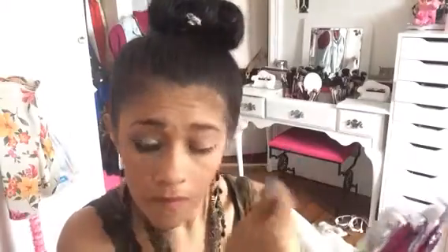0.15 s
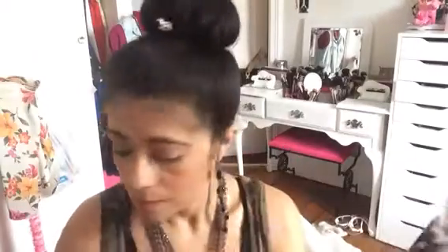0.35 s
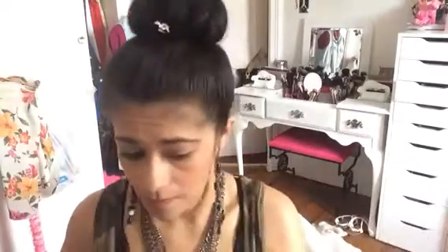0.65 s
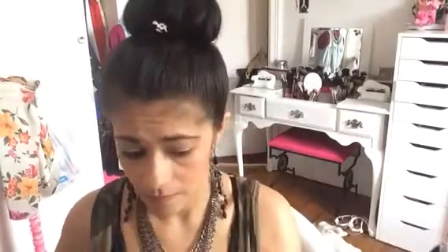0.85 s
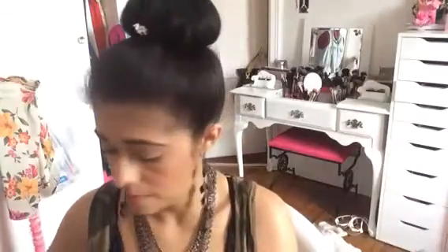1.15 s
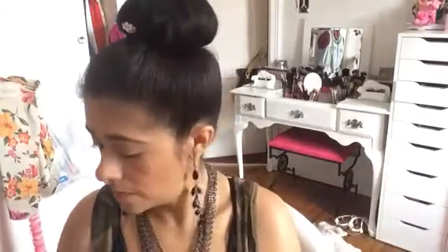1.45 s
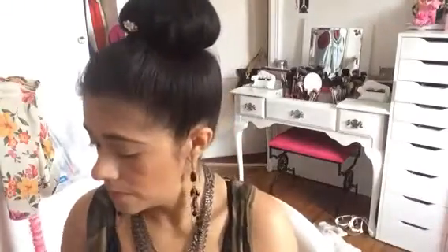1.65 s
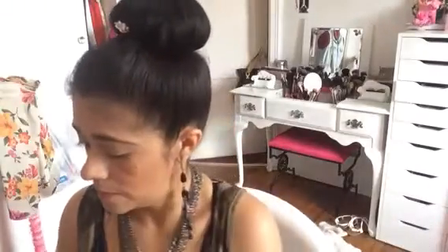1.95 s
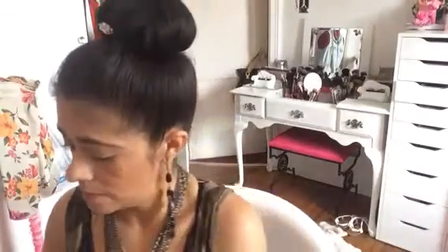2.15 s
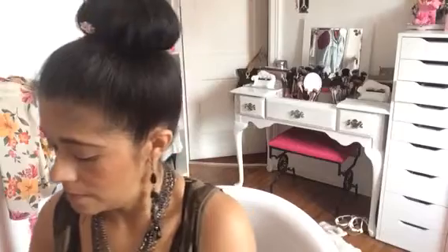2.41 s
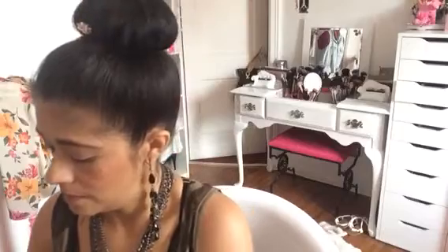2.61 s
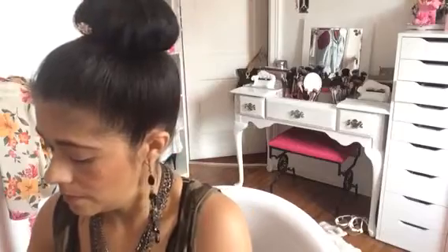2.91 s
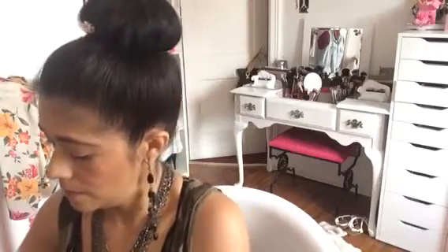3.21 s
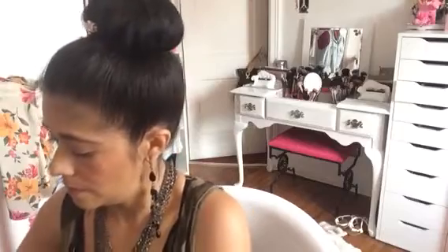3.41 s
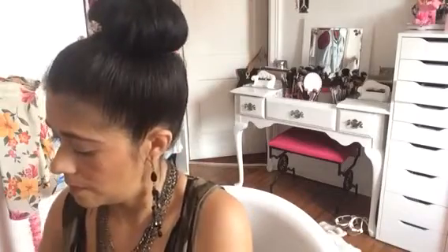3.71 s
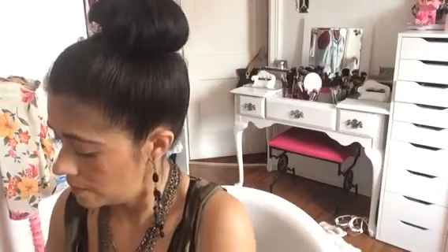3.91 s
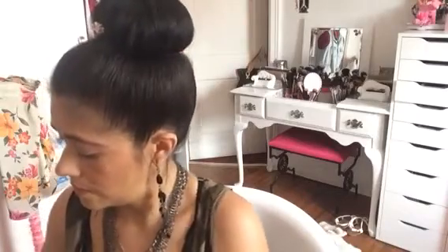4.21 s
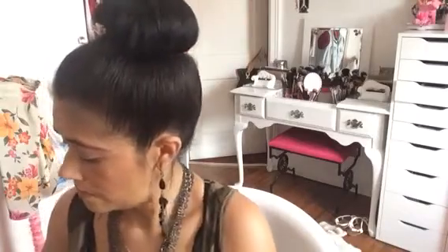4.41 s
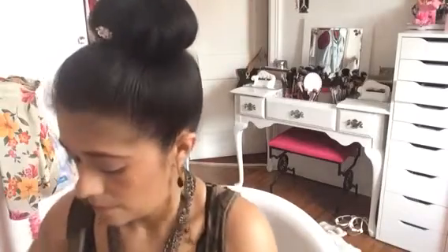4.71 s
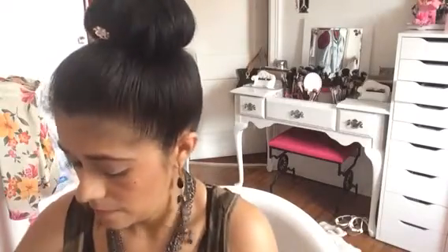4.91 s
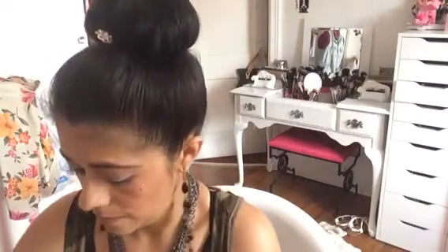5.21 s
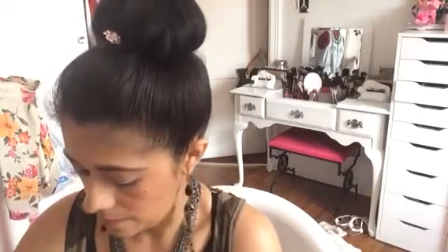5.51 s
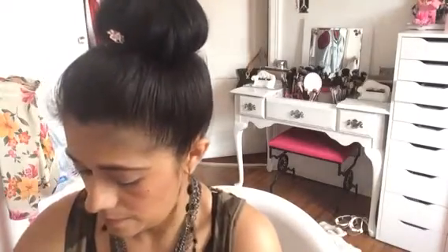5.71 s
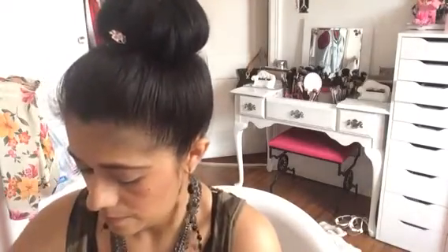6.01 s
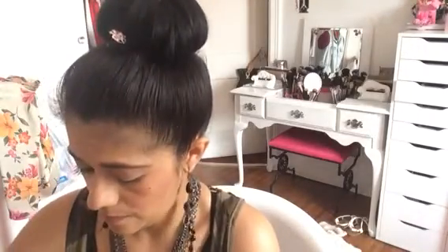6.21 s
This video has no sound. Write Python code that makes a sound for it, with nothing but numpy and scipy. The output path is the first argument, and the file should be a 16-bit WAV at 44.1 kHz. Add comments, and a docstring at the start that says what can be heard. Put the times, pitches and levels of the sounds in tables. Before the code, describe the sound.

Steady low room noise and faint mains hum run throughout a small indoor space with short reverberation. From 0.2 to 0.7 s there is a barely audible rub and nail ticks on plastic; from about 0.9 s a very faint distant clock ticks once a second. Light plastic clicks come at 1.5, 1.7 and 1.9 s. At 2.1 s the loudest event: a plastic case knocks hard on the wooden vanity, a low woody thump with a quick clattering of several hits until 2.2 s. A short scrape follows at 2.4 s, taps at 2.7 s, a firm double knock at 2.93 s, then a cluster of crisp rattling taps from 3.45 to 3.7 s. Near quiet follows with sparse, tiny ticks. From 5.2 to 5.75 s softer taps and dull thumps return, the last strongest with a small rattle. Two faint clicks end it at 6.3 s.

```python
"""Plastic make-up cases and tools on a wooden vanity in a small room, over steady mains hum and room noise.
0.2 s: a faint rub and nail ticks in the hands; 0.86 s: a far clock starts ticking once a second.
1.5 s: light clicks; 2.1 s: the hardest knock thumps the table and chatters; to 3.7 s: slides, taps, rattles.
3.8 s: sparse nail ticks; 5.2 s: more taps and soft thumps; 6.3 s: two last clicks.
Contacts are shell modes plus noise cracks, thumps are table modes, slides are dense random catches."""
import sys
import numpy as np
from scipy import signal
from scipy.fft import rfft, irfft
from scipy.io import wavfile

SR = 44100
rng = np.random.default_rng(int(sys.argv[2]) if len(sys.argv) > 2 else 0)


def output_pcm(signal):
    """Save a mono or channel-first signal as 16-bit PCM at the path in sys.argv[1].

    Samples are clipped to [-1, 1] before scaling.
    """
    pcm = np.clip(np.atleast_2d(signal).T, -1, 1) * 32767
    wavfile.write(sys.argv[1], SR, np.round(pcm).astype(np.int16))


N = 280035


def from_db(db):
    """Decibels to gain."""
    return 10 ** (np.asarray(db) / 20)


def rms_one(x):
    """Scale to rms 1."""
    return x / np.sqrt(np.mean(x ** 2) + 1e-20)


def burst_level(x, seconds):
    """Scale a burst to the energy of rms 1 held for the given time."""
    return x * np.sqrt(seconds * SR / (np.sum(x ** 2) + 1e-20))


def at_hz(points, hz):
    """Interpolate a (Hz, value) table on a log-frequency axis."""
    f, value = np.transpose(points)
    return np.interp(np.log(hz), np.log(f), value)


def cut(x, hz, kind, order=2):
    """Butterworth filter."""
    edge_hz = np.clip(hz, 10, SR * .45)
    return signal.sosfilt(signal.butter(order, edge_hz, kind, fs=SR, output="sos"), x)


def add(track, s, sound):
    """Mix a sound into the track from time s on."""
    i = int(np.clip(round(s * SR), 0, N - 1))
    track[i:i + len(sound)] += sound[:N - i]


def ring(modes, t, gains=1):
    """Sum of decaying sines, one per (Hz, dB, t60 s) mode."""
    hz, db, t60 = np.transpose(modes)[:, :, None]
    decay = from_db(db - 60 * t / t60)
    return np.sum(np.reshape(gains, (-1, 1)) * decay * np.sin(2 * np.pi * hz * t), axis=0)


def alternating(count):
    """Signs +1, -1, +1, ... for neighbouring modes."""
    return (-1) ** np.arange(count)


def coloured(x, spectrum):
    """Filter by a spectrum of (Hz, dB) points."""
    hz = np.maximum(np.fft.rfftfreq(len(x), 1 / SR), 1)
    return irfft(rfft(x) * from_db(at_hz(spectrum, hz)), len(x))


# plastic contacts: t/s, shell level/dB, shell f/Hz, crack level/dB, crack upper edge f/Hz
TAPS = [(0.8035, -87, 2500, -58, 14600), (0.818, -84, 2530, -66, 14100), (0.8698, -87, 2500, -64.5, 14000),
        (1.5439, -44, 2260, -51, 6900), (1.6902, -48.5, 1610, -43.5, 11900),
        (1.879, -61.5, 1460, -78, 9000), (2.0594, -48, 2680, -56, 11000), (2.0891, -20, 917, -27.5, 4700),
        (2.11, -29, 1140, -29.5, 11200), (2.1247, -27.5, 1155, -41.5, 7000), (2.196, -34, 2860, -41, 9600),
        (2.261, -54.5, 2240, -80, 5000), (2.6791, -42, 1650, -47, 7000), (2.687, -47.5, 1390, -55.5, 14200),
        (2.7989, -53, 2360, -59.5, 8050), (2.905, -53, 2250, -55.5, 6100), (2.932, -34, 1680, -41.5, 7700),
        (2.9401, -37.5, 1400, -45, 8500), (3.4496, -48.5, 1980, -40, 6300),
        (3.4841, -52, 1890, -44.5, 5960), (3.5166, -41, 1900, -36.5, 5900), (3.594, -34.5, 1860, -54, 8000),
        (3.6145, -41.5, 2120, -35, 13500), (3.6526, -38.5, 1885, -66, 7700),
        (3.6993, -53, 2330, -57.5, 6100), (5.238, -58, 900, -79, 5000), (5.2631, -48.5, 1780, -58, 7100),
        (5.307, -60.5, 1390, -63.5, 6700), (5.3336, -45.5, 1900, -55.5, 4300),
        (5.4735, -68, 1320, -69, 7220), (5.5755, -48, 1670, -55.5, 6800), (5.657, -56, 1110, -64, 7400),
        (5.7095, -41.5, 1650, -47, 8540), (5.7516, -36.5, 1567, -43.5, 5500),
        (6.3171, -55.5, 2490, -64, 7000), (6.33, -56.5, 2560, -59.5, 12000)]
# modes of a hollow case: f/shell f [ratio], level/dB, t60/s
SHELL = [(.69, -2, 0.011), (0.851, 1, .01), (1, 3, .011), (1.2, -4, 0.0072), (1.479, -8, .009),
         (1.8, -8, 0.0052), (2.3, -10, 0.011)]
TAP_S = .005  # time over which tap levels are taken


def taps(crack_t60_s=0.019, crack_low_hz=2700, grit_db=-2, grit_t60_s=0.024, grit_top_ratio=1.69, snap_db=15):
    """Each contact rings the main modes of a shell, a cloud of weaker ones, and a short bright crack."""
    out, t = np.zeros(N), np.arange(SR // 16) / SR
    for s, shell_db, shell_hz, crack_db, edge_hz in list(TAPS) + chatter() + finger_ticks():
        modes = np.array(SHELL) * [shell_hz, 1, 1]
        strengths = from_db(rng.standard_normal(len(SHELL))) * alternating(len(SHELL))
        grit = rng.standard_normal(len(t)) * from_db(-60 * t / grit_t60_s)
        grit = cut(grit, grit_top_ratio * shell_hz, "low", order=3)
        shell = burst_level(ring(modes, t, strengths), TAP_S) + from_db(grit_db) * burst_level(grit, TAP_S)
        # a small shell radiates little below its lowest mode
        shell = burst_level(cut(shell, modes[0, 0], "high", order=3), TAP_S)
        crack = rng.standard_normal(len(t)) * from_db(-60 * t / crack_t60_s)
        crack[0] = from_db(snap_db)  # first touch is one sharp snap, then the edges buzz
        crack = cut(cut(crack, crack_low_hz, "high"), edge_hz, "low")
        crack = burst_level(crack, TAP_S)
        add(out, s, room(from_db(shell_db) * shell + from_db(crack_db) * crack))
    return out


# loose things chattering: start t/s, end t/s, initial shell level/dB, centre shell f/Hz, initial crack level/dB
RATTLES = [(2.094, 2.15, -31, 930, -49.5), (2.95, 2.974, -55, 902, -74), (3.457, 3.51, -57, 2000, -49),
           (3.525, 3.562, -52, 1920, -56), (5.756, 5.776, -42.5, 1540, -63)]


def chatter(gap_s=0.01, size_db=2.0, settle_db_per_s=110, spread_octaves=.3, edge_hz=7000):
    """Uneven small contacts of changing pitch that weaken as things settle, as rows like those of TAPS."""
    rows = []
    for start, end, shell_db, shell_hz, crack_db in RATTLES:
        for k, (late, size, pitch) in enumerate(rng.standard_normal((16, 3))):
            s = start + gap_s * (k + np.tanh(late) / 2)
            force_db = size_db * size - settle_db_per_s * (s - start)
            hz = shell_hz * 2 ** (spread_octaves * pitch)
            if s < end:
                rows.append((s, shell_db + force_db, hz, crack_db + force_db, edge_hz))
    return rows


# fingers shifting their hold: start t/s, end t/s, rate [ticks per s]
FIDDLING = [(0.199, 0.45, 10.3), (0.9, 1.45, 6), (3.801, 6.3, 1.5)]


def finger_ticks(shell_db=-83, shell_hz=2000, crack_db=-75, edge_hz=13000, size_db=2.5):
    """Faint ticks of nails on plastic at chance moments, as rows like those of TAPS."""
    rows = []
    for start, end, per_s in FIDDLING:
        for k, (late, size) in enumerate(rng.standard_normal((16, 2))):
            s = start + (k + (1 + np.tanh(late)) / 2) / per_s
            force_db = size_db * size
            if s < end:
                rows.append((s, shell_db + force_db, shell_hz, crack_db + force_db, edge_hz))
    return rows


# weight landing on the table: t/s, level/dB, most driven f/Hz, damping by the hand [dB per s]
THUMPS = [(2.0901, -21.3, 240, 134.5), (2.1092, -29, 414, 144), (2.1265, -28, 249, 155.5),
          (2.173, -39, 129, 304), (2.683, -42.5, 540, 250), (2.689, -37, 217, 194),
          (2.886, -48.5, 130, 298), (2.934, -27.5, 309, 1002), (2.9411, -28.5, 286, 650),
          (3.519, -37, 245, 650), (3.5936, -46, 190, 180), (3.654, -50.5, 166, 200), (5.312, -57, 332, 100),
          (5.657, -57.5, 308, 70), (5.7513, -43.5, 590, 498)]
# table-top modes: f/Hz, level/dB, t60 without the hand/s
TABLE = [(90, -13, 0.64), (120.7, -7.5, 0.14), (143.65, 0, 0.22), (182.5, 0, 0.16), (202, -1, .14),
         (238, -12.5, 0.098), (334.6, 6.5, 0.082), (346.5, 5, 0.085), (410, -5.5, 0.077), (499, -9, 0.12),
         (555, -9, 0.16), (639, -8.5, 0.26), (783, -5.5, 0.18), (890, -10, 0.05), (985, -10, .15),
         (1182, -3, .15)]
THUMP_S = .01  # time over which thump levels are taken


def thumps(focus_db_per_octave2=8.0, dull_db=-7, dull_t60_s=.045, low_cut_hz=100):
    """A blow drives the table modes nearest its own pitch, with a short dull knock from the thing put down."""
    out, t = np.zeros(N), np.arange(SR // 2) / SR
    mode_hz = np.array(TABLE)[:, 0]
    for s, db, blow_hz, damping_db_per_s in list(THUMPS) + nudges():
        octaves_off = np.log2(mode_hz / blow_hz)
        drive = from_db(-focus_db_per_octave2 * octaves_off ** 2 + rng.standard_normal(len(TABLE)))
        board = ring(TABLE, t, drive * alternating(len(TABLE)))
        # a hand that stays on the thing shortens the ring
        board = burst_level(board * from_db(-abs(damping_db_per_s) * t), THUMP_S)
        dull_modes = [(blow_hz * .75, 0, dull_t60_s), (blow_hz * 1.35, -1, dull_t60_s)]
        knock = burst_level(ring(dull_modes, t, [1, -1]), THUMP_S)
        add(out, s, room(from_db(db) * burst_level(board + from_db(dull_db) * knock, THUMP_S)))
    return cut(out, low_cut_hz, "high", order=3)


ON_TABLE_S = 2.08  # things are held in the hands until then
NUDGE_RE_SHELL_DB, NUDGE_HZ, NUDGE_DAMPING_DB_PER_S = -15.5, 472, 350


def nudges():
    """Light blows that TAPS pass on to the table once things rest on it, as rows like those of THUMPS."""
    return [(s, shell_db + NUDGE_RE_SHELL_DB, NUDGE_HZ, NUDGE_DAMPING_DB_PER_S)
            for s, shell_db, *_ in TAPS if s > ON_TABLE_S]


# colour of the sliding: f/Hz, level [dB per Hz, relative]
SLIDE_COLOUR = [(150, -8), (380, -1), (520, 9), (700, -4), (950, -10), (1350, 5), (1650, -6), (2500, 0),
                (3100, -7.5), (3800, -7.5), (5000, -18), (9000, -18.5), (15000, -26)]


def sliding(catches_per_s=2500, uneven_db=2.0, grips_per_s=110):
    """Friction: dense tiny catches of uneven size, under a grip that tightens and slackens."""
    t = np.arange(N) / SR
    grip = np.interp(t * grips_per_s, np.arange(N), rng.standard_normal(N))
    catches = (rng.random(N) < catches_per_s / SR) * rng.standard_normal(N) * from_db(uneven_db * grip)
    rub = rms_one(coloured(catches, SLIDE_COLOUR))
    return room(stroke_gain(t) * rub)[:N]


# things rubbed in the hands or slid over the table: start t/s, end t/s, end level/dB, swell on the way/dB
STROKES = [(0.204, 0.69, -82.5, -4), (2.344, 2.385, -63, -1), (2.422, 2.458, -50.5, 7.5),
           (2.635, 2.674, -62, 1.5), (2.87, 2.93, -67, 4), (3.46, 3.56, -63.5, 1)]
GRAB_DB_PER_S, LET_GO_DB_PER_S = 550, 310


def stroke_gain(t):
    """Each stroke takes hold quickly, swells or fades ever faster as the thing gathers speed, and lets go."""
    gain = 0
    for start, end, db, swell_db in STROKES:
        progress = np.clip((t - start) / (end - start), 0, 1)
        fade_db = GRAB_DB_PER_S * np.maximum(start - t, 0) + LET_GO_DB_PER_S * np.maximum(t - end, 0)
        gain = gain + from_db(db + swell_db * (progress ** 2 - 1) - fade_db)
    return gain


# clock-case modes: f/Hz, level/dB, t60/s
CLOCK = [(894, -6, .06), (1220, -2, .05), (2260, 0, .04), (2420, -3, .035), (3640, -2, .025),
         (4000, -2, .02), (4450, -1, .02)]
FIRST_TICK_S, BEAT_S = 0.864, 1
TICK_DB, TOCK_RE_TICK_DB = -73, 3.5
TICK_S = .03  # time over which tick levels are taken


def clock(swell_s=0.0086, rattle_db=0, rattle_low_hz=1300, rattle_top_hz=6000):
    """Each step of the movement gives a blurred rattle that also rings the clock's case."""
    out, t = np.zeros(N), np.arange(SR // 4) / SR
    case = ring(CLOCK, t)
    for k, s in enumerate(np.arange(FIRST_TICK_S, N / SR, BEAT_S)):
        db = TICK_DB + TOCK_RE_TICK_DB * (k % 2)
        rattle = rng.standard_normal(len(t)) * np.sqrt(t) * np.exp(-.5 * t / swell_s)
        ringing = burst_level(signal.fftconvolve(rattle, case)[:len(t)], TICK_S)
        rattle = burst_level(cut(rattle, [rattle_low_hz, rattle_top_hz], "band"), TICK_S)
        add(out, s, room(from_db(db) * (ringing + from_db(rattle_db) * rattle)))
    return out


# reverberation: f/Hz, level against the direct sound/dB
ROOM_DB = [(150, -9), (400, -10), (1000, -5.5), (2800, -5), (7000, -4.5), (14000, -9.5)]


def room(sound, t60_s=0.2, first_echo_s=0.0023, build_s=0.0021):
    """Add dense echoes from furniture and walls, in a new random pattern for each sound passed in."""
    t = np.arange(SR // 2) / SR
    envelope = np.clip((t - first_echo_s) / build_s, 0, 1) * from_db(-60 * t / t60_s)
    echoes = rng.standard_normal(len(t)) * envelope / np.sqrt(np.sum(envelope ** 2))
    direct = t == 0
    return signal.fftconvolve(sound, direct + coloured(echoes, ROOM_DB) * (t < t60_s))


# room noise: f/Hz, level [dB per Hz, relative]
AIR = [(15, -47.5), (25, -19.5), (43, -3), (64, -4), (86, -9.5), (119, 3), (148, -10.5), (173, -1.5),
       (209, -8), (359, -9), (389, -17), (421, -15), (945, -20.5), (2000, -29), (4500, -32.5),
       (14300, -40.5), (15500, -39.5)]
# mains hum: f/Hz, rms level/dB
HUM = [(59.6, -80.5), (119.5, -78), (179, -78.5), (359.5, -81)]


def background(air_rms_db=-67, low_cut_hz=40):
    """Steady coloured noise of the room, with mains hum as sines of random phase."""
    t = np.arange(N) / SR
    hum = sum(from_db(db) * np.sqrt(2) * np.sin(2 * np.pi * (hz * t + rng.random())) for hz, db in HUM)
    air = coloured(cut(rng.standard_normal(N), low_cut_hz, "high"), AIR)
    return hum + from_db(air_rms_db) * rms_one(air)


def scene():
    """Sum of all layers, heard by one microphone."""
    return (taps() + thumps() + sliding() + clock() + background())[None, :]


CUTOFF_HZ = 15600


def record(dry):
    """Cut the top steeply: elliptic low-pass, 0.1 dB ripple, 70 dB stopband."""
    return signal.sosfilt(signal.ellip(10, .1, 70, CUTOFF_HZ, fs=SR, output="sos"), dry)


dry = scene()
out = record(dry)
output_pcm(out)
```